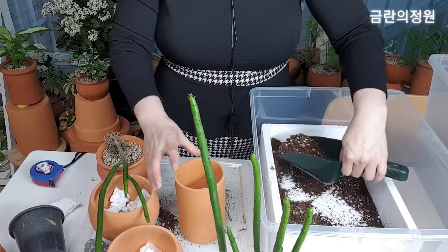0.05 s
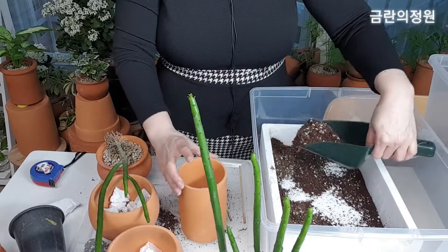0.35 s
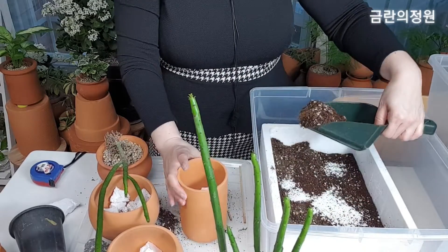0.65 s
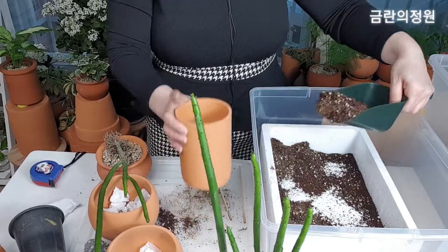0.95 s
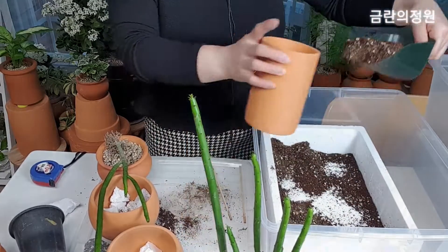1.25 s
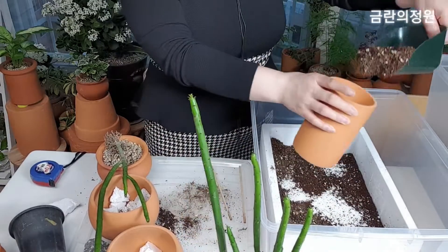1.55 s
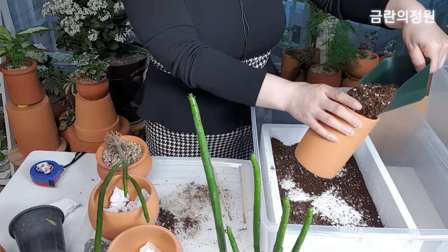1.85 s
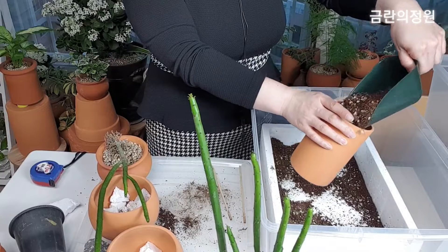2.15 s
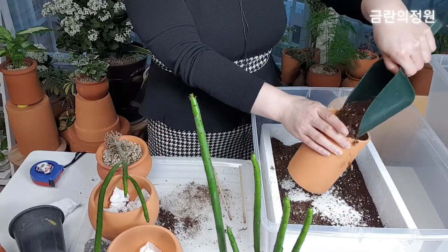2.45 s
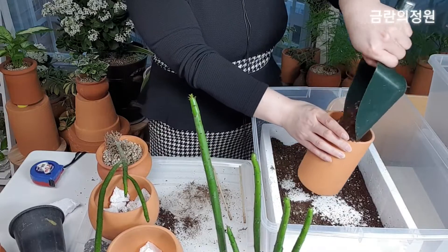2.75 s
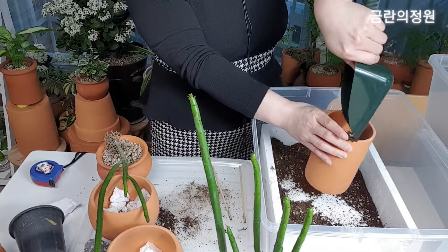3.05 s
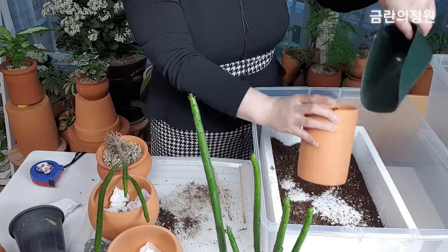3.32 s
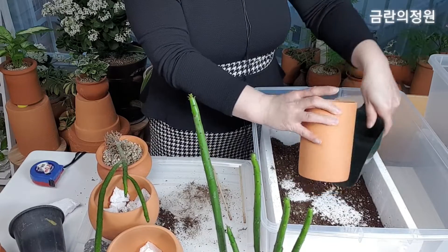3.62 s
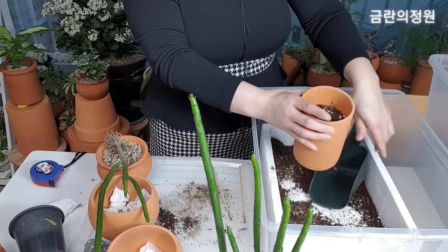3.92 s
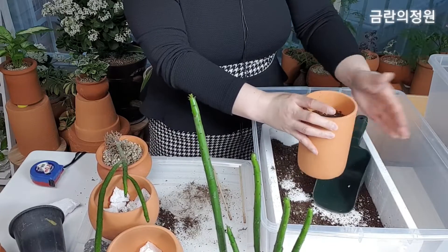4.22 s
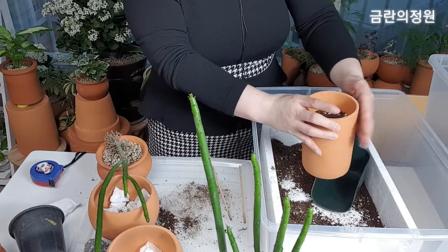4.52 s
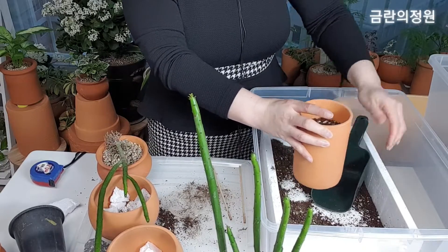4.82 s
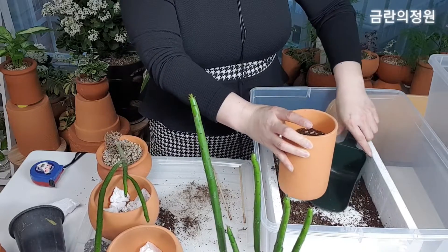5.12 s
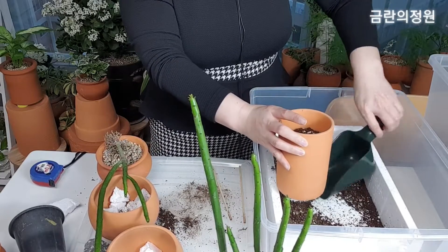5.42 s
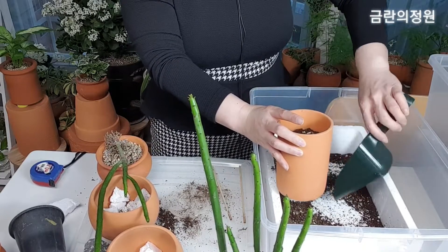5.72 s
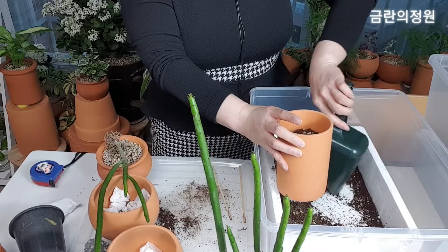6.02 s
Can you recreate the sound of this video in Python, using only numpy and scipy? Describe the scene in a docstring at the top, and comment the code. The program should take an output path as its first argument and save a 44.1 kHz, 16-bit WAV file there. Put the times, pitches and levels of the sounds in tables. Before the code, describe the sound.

A plastic scoop digs into gritty soil in a plastic bin, with short scrapes and hollow knocks through the first 0.8 seconds and a soft rustle of clothes. From about 1.3 to 2 seconds, an empty clay pot slips through fingers with a dry, bell-like ring. Between 2 and 3.5 seconds, soil trickles and rattles into the pot, small clods landing with hollow plops while the scoop clinks lightly on the rim. The scoop knocks at 3.8 seconds, then falls and bounces in the bin around 4.1 with a booming thump, the loudest sound. A hand pats the filled pot four times from 4.3 to 4.8 seconds, the last two stronger. From 5 seconds to just past 6, the scoop scrapes and knocks through the soil again. Everything sounds near, in a small room with slight reverberation and faint, low background noise.

```python
"""Potting soil and a clay pot

Gritty soil is scooped from a plastic bin and poured into a hand-held clay pot in a small room.
Friction makes the empty pot sing as it slips through the fingers; grains rattle into it and the
scoop clinks on the rim. The scoop drops into the bin, a hand pats the pot, and the scoop digs in
again. Each impact or stream of grains excites the resonances of the body that it strikes."""
import sys
import numpy as np
from scipy import signal
from scipy.fft import rfft, irfft
from scipy.io import wavfile
from scipy.ndimage import uniform_filter1d

SR = 44100
rng = np.random.default_rng(int(sys.argv[2]) if len(sys.argv) > 2 else 0)


def unload_wav(signal):
    """Save mono or channel-first audio to the path in sys.argv[1] as 16-bit WAV at rate SR, clipped to [-1, 1]."""
    wavfile.write(
        sys.argv[1],
        SR,
        np.round(np.clip(np.atleast_2d(signal).T, -1, 1) * 32767).astype(np.int16),
    )


N = 272097
CUTOFF_HZ = 16000

# spectral envelopes of the scoop, the clay wall and the soil in the pot: f/Hz, level/dB
SCOOP_ENVELOPE = [(40, 1), (100, -3), (160, -0.5), (400, 0.5), (800, 7), (1400, -2.5), (3000, 0.5),
                  (5000, -5.5), (9000, -12), (12000, -17.5), (16000, -39)]
CLAY_ENVELOPE = [(40, 4), (170, -15.5), (350, -2), (900, 1), (1500, -8), (3500, 1), (6000, -10.5),
                 (10000, -2), (16000, -25)]
SOIL_ENVELOPE = [(60, -18.5), (300, -3), (800, 9), (1400, -12), (3000, -18), (6000, -17.5), (10000, -11),
                 (13000, -23.5), (16000, -29)]
# resonances of the scoop and the part-filled pot: f/Hz, bandwidth/Hz, level/dB re the envelope
SCOOP_RESONANCES = [(470, 25, 7), (652, 17, 13), (861, 16, 9.5), (1142, 30, 10), (1230, 17, -8),
                    (1510, 25, 11), (1744, 19, 12.5), (2000, 110, 8), (2380, 69, 3), (2590, 31, 12),
                    (3300, 420, 1.5), (4195, 170, 5), (5750, 36, 8)]
POT_RESONANCES = [(620, 12.7, 11.7), (1098, 56, 4.9), (1650, 150, 2.5), (2340, 31, 1.2), (3170, 56, 10.5),
                  (4170, 37, 11), (5810, 71, 12), (6370, 20, 2.9), (6690, 41, 13.4), (7800, 44, 12),
                  (8400, 41, 11)]
# a hand pats the filled pot: t/s, level/dB, hardness/dB, contact time/s, favoured f/Hz
HAND_PATS = [(4.2932, -34.5, 0, 0.0058, 1180), (4.4634, -34, 4, 0.0051, 1200),
             (4.6248, -27.5, 5.5, 0.0038, 458), (4.7924, -27, 2, 0.0047, 1180)]


def from_db(db):
    """Amplitude ratio of a level in decibels."""
    return 10 ** (np.asarray(db) / 20)


def rms(x):
    """Root-mean-square amplitude."""
    return np.sqrt(np.mean(x ** 2) + 1e-20)


def seconds(length):
    """Sample times over a duration."""
    return np.arange(int(length * SR)) / SR


def at_hz(points, hz):
    """Interpolation on a logarithmic frequency axis."""
    known_hz, values = np.transpose(points)
    return np.interp(np.log(np.maximum(hz, 1)), np.log(known_hz), values)


def band(x, edges, order=3):
    """Butterworth band-pass filter."""
    return signal.sosfilt(signal.butter(order, edges, "band", fs=SR, output="sos"), x)


def through(x, response):
    """Convolution with an impulse response."""
    return signal.fftconvolve(x, response)[:len(x)]


def add(out, s, sound):
    """Superposition of a sound that starts at time s."""
    start = max(round(s * SR), 0)
    out[start:start + len(sound)] += sound[:N - start]


def body_response(envelope, modes=(), size=32768):
    """Minimum-phase impulse response of a spectral envelope with Lorentzian resonance peaks."""
    hz = np.arange(size // 2 + 1) * SR / size
    peaks = sum(from_db(db) ** 2 / (1 + (2 * (hz - centre) / width) ** 2) for centre, width, db in modes)
    magnitude = from_db(at_hz(envelope, hz)) * np.sqrt(1 + peaks)
    cepstrum = irfft(np.log(magnitude))
    # folding the cepstrum makes the response causal
    cepstrum[1:size // 2] *= 2
    cepstrum[size // 2 + 1:] = 0
    return irfft(np.exp(rfft(cepstrum)))[:size // 2]


def coloured_noise(envelope):
    """Stationary noise of unit rms with a given spectral envelope."""
    noise = through(rng.standard_normal(N), body_response(envelope))
    return noise / rms(noise)


def gesture(start_s, length_s, db, swell_db, attack_s, release_s):
    """Amplitude envelope of a movement: linear attack, even change of level, exponential release."""
    age = np.arange(N) / SR - start_s
    progress = np.clip(age / length_s, 0, 1)
    release = np.exp(-np.clip((age - length_s) / release_s, 0, 20))
    return np.clip(age / attack_s, 0, 1) * from_db(db + swell_db * (progress - .5)) * release


def contact_force(contact_s, size=4096):
    """Broadband excitation: the force builds as two surfaces meet and dies in a brief chatter."""
    age = (np.arange(size) + 1) / SR / max(contact_s, 1e-4)
    shape = (1 - np.exp(-age / 0.29)) * np.exp(-age)
    force = rng.standard_normal(size) * shape
    for _ in range(2):   # flatten the spectrum, then confine the pulse in time again
        spectrum = rfft(force, 2 * size)
        force = irfft(spectrum / (np.abs(spectrum) + 1e-12))[:size] * shape ** 0.13
    return force


def impacts(blows, envelope, modes, balance_db, click_slope, favour_db, width_hz, q, gain_db, ring_hz=()):
    """Modal excitation: the spot struck favours some modes; hardness adds click, long contact boom."""
    out = np.zeros(N)
    bands_hz = [(30, 300), (300, 1400), (1400, 5000), (5000, 16000)]   # boom, body, ring, click
    boom_db, ring_db, click_db = balance_db   # relative to the body band
    for s, body_db, hard_db, contact_s, *spot_hz in blows:
        # higher modes lose their energy faster, so their peaks are wider
        favoured = [(hz, width_hz + hz / q, favour_db) for hz in (*spot_hz, *ring_hz)]
        struck = through(body_response(envelope, [*modes, *favoured]), contact_force(contact_s))
        push_db = 12.5 * np.log2(contact_s / 0.0041)   # a longer push moves the whole wall
        levels = (boom_db + push_db, 0, ring_db + hard_db, click_db + click_slope * hard_db)
        for edges, db in zip(bands_hz, levels):
            part = band(struck, edges)
            onset_rms = rms(part[:int(.025 * SR)])
            add(out, s, part * from_db(body_db + db + gain_db) / onset_rms)
    return out


def grains(base_per_s, spread_db, dust, cycles, clump_db):
    """Shot noise at an even level: clustered grain impacts ring briefly over a hiss of fine dust."""
    clumps = uniform_filter1d(rng.standard_normal(N), size=220)
    hits = rng.random(N) < base_per_s / SR * from_db(clump_db * clumps / rms(clumps))
    strengths = from_db(spread_db * np.minimum(rng.exponential(1, N), 3.5))
    clicks = hits * strengths * rng.choice([-1, 1], N)
    pitches_hz = np.geomspace(900, 15000, 28)
    pitch_index = rng.integers(0, len(pitches_hz), N)
    ringing = np.zeros(N)
    for k, hz in enumerate(pitches_hz):
        radius = from_db(-60 * hz / (cycles * SR))   # 60 dB of decay in the given cycles
        resonator = [1, -2 * radius * np.cos(2 * np.pi * hz / SR), radius ** 2]
        ticks = signal.lfilter([1, 0, -1], resonator, clicks * (pitch_index == k) + 1e-18)
        ringing += ticks / rms(ticks) * np.sqrt(hz)
    # the bare impacts also knock on the surface under the grains
    stream = ringing / rms(ringing) + 0.65 * clicks / rms(clicks) + dust * rng.standard_normal(N)
    return stream / np.sqrt(uniform_filter1d(stream ** 2, size=1100) + 1e-9)


def band_flows(moves, balance_db, attack_s, release_s):
    """Amplitude envelopes of body, rasp and fizz; brightness tilts the spectrum from body to fizz."""
    flows = np.zeros((3, N))
    for *move, bright_db in moves:
        gains = from_db(np.array(balance_db) + bright_db * np.array([-1, 0, 1]))
        flows += np.outer(gains, gesture(*move, attack_s, release_s))
    return flows


def running_grit(flows, response, stream):
    """Forced vibration: a stream of grains drives a body, each of three bands following its flow."""
    out = np.zeros(N)
    bands_hz = [(200, 1400), (1400, 5000), (5000, 16000)]   # body, rasp, fizz
    for edges, flow in zip(bands_hz, flows):
        part = band(response, edges)
        out += through(stream * flow, part) / np.linalg.norm(part)
    return out


def background():
    """Ambient noise: faint, steady and strongest in the bass."""
    # spectral envelope: f/Hz, level/dB
    envelope = [(15, -18), (25, 10), (50, 8), (95, -1.5), (160, -0.5), (405, -3), (887, -2), (1840, -12.5),
                (2550, -13.5), (3160, -14), (3920, -23), (4250, -18.5), (5000, -27.5), (5730, -19),
                (7510, -29), (8360, -23), (10000, -30), (11000, -39), (16000, -52)]
    return from_db(-59) * coloured_noise(envelope)


def room(x, early_db, late_db, early_s):
    """Early reflections from bin walls and table, followed by the room's duller reverberation."""
    # reverberation time: f/Hz, T60/s
    decay_times = [(100, 0.61), (500, 0.4), (1500, 0.38), (4000, 0.34), (12000, 0.31)]
    t = seconds(.7)
    edges = np.geomspace(30, CUTOFF_HZ, num=9)
    tail = np.zeros(len(t))
    for low, high in zip(edges, edges[1:]):
        t60 = at_hz(decay_times, np.sqrt(low * high))
        tail += band(rng.standard_normal(len(t)), (low, high)) * from_db(-60 * t / t60)
    tail *= np.clip((t - .006) / 0.029, 0, 1)
    echoes = rng.standard_normal(len(t)) * (t > .002) * np.exp(-(t / early_s) ** 2)
    early = from_db(early_db) * echoes / np.linalg.norm(echoes)
    late = from_db(late_db) * tail / np.linalg.norm(tail)
    return x + through(x, early + late)


def soft_swishes():
    """Amplitude-modulated noise: soft swishes of movement, and the dull rush after a knock."""
    # swishes: t/s, duration/s, level/dB, swell/dB
    swishes = [(0.775, 0.059, -42.5, -12.5), (1.21, 0.096, -55, 6), (3.33, 0.13, -50, 13.5),
               (4.335, 0.093, -34, 4)]
    # spectral envelope: f/Hz, level/dB
    envelope = [(59, -21), (100, -11), (318, -8), (743, -3.5), (877, -5), (993, -2.5), (1120, -5.5),
                (2130, -11), (6000, -31), (14000, -51)]
    gain = sum(gesture(*swish, attack_s=0.036, release_s=0.063) for swish in swishes)
    return from_db(-5) * gain * coloured_noise(envelope)


def clothes_rustle():
    """Friction noise of clothes and grip, in muffled bursts."""
    # movements: t/s, duration/s, level/dB, swell/dB
    moves = [(0.012, 0.18, -43, -23), (0.292, .02, -46, 0), (1.758, 0.14, -48, -9)]
    # spectral envelope: f/Hz, level/dB
    envelope = [(50, -14), (130, -5), (200, -7.5), (320, -1), (500, -8), (1500, -14), (8000, -72)]
    motion = sum(gesture(*move, attack_s=0.01, release_s=0.03) for move in moves)
    return from_db(-7.5) * motion * coloured_noise(envelope)


def creeping_grip():
    """Narrow-band resonance: slow friction of skin keeps one wall mode of the pot whispering."""
    # creeps of the hand: t/s, duration/s, f/Hz, bandwidth/Hz, level/dB
    creeps = [(0.3, 0.18, 5850, 161, -50), (0.896, 0.27, 2490, 398, -66), (1.116, 0.16, 3100, 80, -70)]
    out = np.zeros(N)
    for s, length_s, hz, width_hz, db in creeps:
        edges = (hz - width_hz / 2, hz + width_hz / 2)
        whisper = band(rng.standard_normal(SR), edges, order=2)[:int(length_s * SR)]
        add(out, s, from_db(db) * np.hanning(len(whisper)) * whisper / rms(whisper))
    return out


def singing_pot():
    """Frictional excitation: dry skin on unglazed clay feeds bell-like modes until the hand damps them."""
    # finger slips: t/s, level/dB, rise/s, fade/s, cutoff/Hz, grip (0 first, 1 second), undamped time/s
    slips = [(1.328, -1, 0.013, 0.071, 15000, 0.17, 0.34), (1.503, -3, 0.004, 0.032, 950, 0.15, 0.093),
             (1.716, -1.5, 0.0085, 0.19, 15460, 0.94, 0.089)]
    # wall modes of the empty pot: f/Hz, T60/s, level/dB at the first grip, level/dB at the second
    wall_modes = [(797, 0.72, -44, -50.5), (820, 0.38, -54.5, -51.5), (950, 0.076, -74, -54),
                  (1630, 0.095, -43, -50.5), (1600, 1, -55, -62), (1633, 0.14, -44.5, -63),
                  (2000, 0.042, -49.5, -70), (2600, 0.18, -69, -63), (2760, 0.21, -41.5, -55.5),
                  (2800, 0.21, -38.5, -64), (3230, 0.19, -48, -57), (4180, 0.03, -44.5, -55),
                  (4430, 0.39, -56, -68), (4500, 0.051, -58, -48), (4980, 0.28, -58, -82),
                  (5440, 0.18, -57, -84), (5290, 0.15, -49.5, -81), (6000, 0.3, -68, -69),
                  (6090, 0.063, -48, -70), (7065, 0.22, -61, -88), (7300, 0.1, -53, -84),
                  (7750, 0.079, -61.5, -63.5), (8270, 0.1, -63, -81), (8950, 0.11, -64, -73),
                  (9530, 0.14, -65.5, -84), (10900, 0.14, -71, -97), (12600, 0.12, -72, -102)]
    # spectral envelope of the friction hiss: f/Hz, level/dB
    hiss_envelope = [(120, -63), (200, -35), (696, -13.5), (818, 0), (1360, -19.5), (1630, -15),
                     (2290, -13.5), (2850, -2), (3470, -17.5), (6080, -19), (15000, -57)]
    out, t = np.zeros(N), seconds(.5)
    ring_samples, damping_s = .2 * SR, 0.07
    sagging_t = t * (1 - 0.02 * t)   # the pitch sags a little as the finger pressure changes
    for s, db, rise_s, fade_s, cutoff_hz, grip, free_s in slips:
        slip = np.minimum(t / rise_s, 1) * np.exp(-np.maximum(t - 2 * rise_s, 0) / fade_s)
        sound = slip * coloured_noise(hiss_envelope)[:len(t)] * from_db(-35 - 9 * grip)
        for hz, t60, first_db, second_db in wall_modes:
            mode = np.sin(2 * np.pi * hz * sagging_t) * from_db(-60 * t / t60)
            ring = through(slip * rng.standard_normal(len(t)), mode)
            mode_db = 0.5 + first_db + grip * (second_db - first_db)
            sound += ring * np.sqrt(ring_samples / np.sum(ring ** 2)) * from_db(mode_db)
        sound *= np.exp(-np.maximum(t - free_s, 0) / damping_s)
        low_pass = signal.butter(5, cutoff_hz, fs=SR, output="sos")
        add(out, s, from_db(db) * signal.sosfilt(low_pass, sound))
    return out


def bin_thumps():
    """Low wall modes of the bin boom when it is bumped and when the scoop falls in and bounces."""
    # blows: t/s, level/dB, hardness/dB, contact time/s, favoured low f/Hz, favoured high f/Hz
    thumps = [(0.5903, -39, -3.5, 0.0063, 258, 552), (4.004, -27, 0.5, 0.0065, 290, 360),
              (4.0874, -17.5, 1.5, 0.0064, 182, 620), (4.2006, -36, -17, 0.0063, 159, 560),
              (4.2591, -37.5, -0.5, 0.0039, 150, 551), (4.9413, -55, 1, 0.0027, 280, 630),
              (5.082, -36.5, 4, 0.0089, 131, 348), (5.9091, -35.5, -1, 0.0041, 320, 400)]
    # spectral envelope: f/Hz, level/dB
    envelope = [(25, -19), (60, -0.5), (200, -9.5), (600, -6.5), (1000, -9.5), (1600, -14), (3000, -15.5),
                (6000, -25.5), (10000, -34), (16000, -58)]
    # wall resonances: f/Hz, bandwidth/Hz, level/dB re the envelope
    modes = [(46.3, 3.2, 21), (76, 13, 4), (143, 4.8, 17.5), (179, 12.7, 18.5), (266, 41, 13.5),
             (360, 13, 8), (449, 4.6, 9.5), (600, 29, 1), (672, 28, 12), (827, 28, 11), (2350, 38, -5)]
    return impacts(thumps, envelope, modes, balance_db=(-11, -12.5, -27), click_slope=3.5,
                   favour_db=16.5, width_hz=4.6, q=9.7, gain_db=1.13)


def pot_pats():
    """Damped vibration of the filled pot as a hand pats its side."""
    # resonances of the filled pot: f/Hz, bandwidth/Hz, level/dB re the envelope
    modes = [(470, 300, 7.2), (1180, 28, 18), (1740, 150, 13.3), (2300, 370, 12.6), (3085, 85, 15.5),
             (3770, 40, 2.5), (4190, 110, 11), (5600, 400, 13.7), (6400, 52, 21), (8540, 65, 15)]
    return impacts(HAND_PATS, CLAY_ENVELOPE, modes, balance_db=(-8, -1.5, -10), click_slope=-0.5,
                   favour_db=13, width_hz=57, q=80, gain_db=-4, ring_hz=(3120,))


def scoop_knocks():
    """Free vibration of the hollow scoop after each knock."""
    # blows: t/s, level/dB, hardness/dB, contact time/s, favoured low f/Hz, favoured high f/Hz
    knocks = [(0.001, -35, -3, 0.0058, 820, 1720), (0.3633, -41.5, 1, 0.0027, 690, 1900),
              (0.382, -35, 4.5, 0.0047, 480, 2130), (0.3966, -34.5, 0.5, 0.0033, 470, 2020),
              (0.4128, -35.5, -6, 0.0006, 470, 1330), (0.778, -29.5, -10, 0.0041, 610, 1286),
              (2.0006, -36, -10.5, 0.0024, 720, 1475), (2.0106, -51, 8.5, 0.0034, 650, 1600),
              (2.0546, -51, 6.5, 0.0025, 670, 1660), (2.0903, -48.5, -0.5, 0.004, 650, 1650),
              (3.2056, -53, 9, 0.003, 1080, 1830), (3.2208, -51, 6.5, 0.00097, 1100, 1850),
              (3.8245, -25, -1, 0.0022, 1000, 2050), (4.0777, -26.5, 5, 0.0064, 680, 2350),
              (5.1415, -34.5, 0, 0.0033, 855, 2960), (5.5366, -36, -0.5, 0.0059, 974, 2750),
              (5.5805, -39, -8, 0.0026, 650, 2600), (5.7323, -40, 0, 0.0037, 1025, 2260),
              (5.9946, -45.5, 3.5, 0.0019, 586, 2380), (6.0874, -38.5, 12, 0.01, 1020, 3370)]
    return impacts(knocks, SCOOP_ENVELOPE, SCOOP_RESONANCES, balance_db=(-17, -0.5, -13.5),
                   click_slope=1.6, favour_db=16, width_hz=51, q=130, gain_db=-1.5)


def stone_ticks(contact_s=0.0017):
    """Short contacts of single stones excite the high resonances of the blade."""
    # stones: t/s, level/dB, favoured f/Hz
    stones = [(0.114, -64, 6100), (0.2342, -73, 1600), (0.34, -67, 1300), (0.5596, -67.5, 2000),
              (2.115, -64.5, 4500), (2.6233, -55.5, 3560), (2.7757, -56.5, 3240), (3.1065, -62.5, 3470),
              (3.2483, -59, 4970), (5.3147, -60, 2830), (5.4863, -64, 6000)]
    ticks = [(s, db, 0, contact_s, hz) for s, db, hz in stones]
    return impacts(ticks, SCOOP_ENVELOPE, SCOOP_RESONANCES, balance_db=(4, 13, 5.5), click_slope=1,
                   favour_db=13, width_hz=260, q=46, gain_db=-2.5)


def rim_clinks():
    """Lightly damped high modes of the clay ring as scoop and stones strike it."""
    # blows: t/s, level/dB, hardness/dB, contact time/s, favoured low f/Hz, favoured high f/Hz
    clinks = [(2.2306, -48, 2.5, 0.0053, 3120, 5900), (2.2861, -45.5, 8, 0.0048, 3120, 5800),
              (2.4483, -43.5, 4.5, 0.0035, 3110, 6690), (2.4795, -49, 12.5, 0.0026, 3100, 6660),
              (2.8887, -41, 0, 0.0032, 4170, 6690), (2.9379, -46.5, 6.5, 0.0051, 4170, 6600),
              (3.0081, -53, 7.5, 0.0047, 3500, 6370), (3.1738, -57.5, 26, 0.0018, 3456, 8300)]
    return impacts(clinks, CLAY_ENVELOPE, POT_RESONANCES, balance_db=(-17, -2, -2.5), click_slope=.5,
                   favour_db=29, width_hz=14, q=140, gain_db=1)


def falling_clods():
    """Cavity resonance: clods drop and settle in the pot and sound its hollow."""
    # clods: t/s, level/dB, hardness/dB, contact time/s, cavity f/Hz
    clods = [(2.4366, -30.5, -1, 0.0083, 658), (2.5105, -32, -7, 0.0015, 652),
             (2.5343, -34, -5, 0.0027, 650), (2.5729, -33.5, 1, 0.0058, 687),
             (2.5949, -30.5, -2, 0.008, 650), (2.7993, -42, -0.5, 0.004, 650),
             (2.8753, -36, -10, 0.0021, 650), (2.9975, -50.5, 13, 0.0038, 1060),
             (3.029, -50, 8, 0.0044, 706), (3.4643, -37.5, -22, 0.005, 533),
             (3.4779, -37.5, -7.5, 0.0084, 553)]
    return impacts(clods, SOIL_ENVELOPE, POT_RESONANCES, balance_db=(-27.5, -8, -22), click_slope=2.12,
                   favour_db=21.5, width_hz=29, q=63, gain_db=-1.5, ring_hz=(1736,))


def grit_on_scoop():
    """Granular excitation: grit scrapes and rattles on the scoop as it digs, is knocked or lands."""
    # scrapes and rattles: t/s, duration/s, level/dB, swell/dB, brightness/dB
    bursts = [(0, 0.03, -34, -26, 2.5), (0.058, 0.12, -54.5, -14, -3), (0.316, 0.051, -47.5, 13, -4),
              (.362, 0.041, -35.5, 1, -3), (0.402, 0.17, -52, -24, -4), (0.547, 0.11, -61, 3, 1),
              (3.835, 0.031, -35, -1, -0.5), (3.978, 0.033, -43.5, -11, 5), (4.009, 0.04, -35, -2, -1),
              (4.11, 0.2, -45, -29, -4), (5.084, 0.037, -40, -11, -5.5), (5.165, 0.052, -43, 6, -2),
              (5.232, 0.014, -44, 11, -1.5), (5.328, 0.043, -41.5, -12, 0.5),
              (5.375, 0.018, -50.5, 4, -10.5), (5.396, 0.047, -33.5, -8, 1), (5.55, 0.09, -49.5, -4, -6.5),
              (5.618, 0.1, -43, 9, 2), (5.76, .13, -57.5, -3, -2.5), (5.918, 0.066, -40, -14.5, 1),
              (5.997, 0.026, -40, 0.5, -2.5), (6.048, 0.053, -45, 15, -2.5), (6.097, 0.075, -38, -5, 1.5)]
    # spectral envelope of grit on the blade: f/Hz, level/dB
    envelope = [(88, -20), (150, -1), (475, -8.5), (1100, -7.5), (1790, -4.5), (1980, 3), (2600, 2),
                (3420, 0), (5250, -12), (5790, -16), (8900, -18), (11500, -26), (16000, -35)]
    # blade resonances: f/Hz, bandwidth/Hz, level/dB re the envelope
    modes = [(470, 20, -18), (650, 180, 11), (1000, 130, 4.5), (2000, 68, -9), (2380, 170, 4),
             (2770, 63, 3), (3300, 47, 3), (4430, 190, 3), (5850, 53, 7)]
    flows = band_flows(bursts, balance_db=(0.34, 0, -7), attack_s=0.0099, release_s=.011)
    stream = grains(base_per_s=1800, spread_db=1, dust=0.62, cycles=30, clump_db=5)
    return from_db(-4) * running_grit(flows, body_response(envelope, modes), stream)


def pouring_soil():
    """Granular flow: soil sliding off the scoop, or shaken by a pat, excites the pot's resonances."""
    # spurts and trickles: t/s, duration/s, level/dB, swell/dB, brightness/dB
    slides = [(2.003, 0.27, -63, -3, 5.5), (2.218, 0.035, -47.5, -4, -1.5), (2.26, 0.084, -56.5, -4, -4),
              (2.363, 0.064, -47.5, 3, 0), (2.423, .035, -42, 1.5, 4.5), (2.47, 0.17, -44.5, 1, 1.5),
              (2.68, .13, -52.5, -1.5, 1), (2.82, 0.07, -47, 7, -4.5), (2.888, 0.074, -46, 5, 2),
              (2.98, 0.057, -49.5, 4.5, 0), (3.05, 0.11, -61.5, -7, 3), (3.18, 0.021, -55.5, -4, 4),
              (3.22, 0.046, -69, -6, -2), (3.56, 0.33, -74, -24.5, 0.5)]
    balance_db = (2.47, 0, -8.5)   # body, rasp, fizz
    poured = band_flows(slides, balance_db, attack_s=0.004, release_s=0.013)
    rattles = [(s, 0.018, db - 22, 0, 0) for s, db, *_ in HAND_PATS]   # one brief, faint slide per pat
    shaken = band_flows(rattles, balance_db, attack_s=0.0099, release_s=0.023)
    stream = grains(base_per_s=4200, spread_db=3.5, dust=0.45, cycles=38, clump_db=4.5)
    pot = body_response(SOIL_ENVELOPE, POT_RESONANCES)
    return from_db(-0.5) * running_grit(poured + shaken, pot, stream)


def scene():
    """Superposition of impacts, soil and handling in the room, over the ambient noise."""
    blows = scoop_knocks() + stone_ticks() + bin_thumps() + pot_pats() + rim_clinks()
    soil = falling_clods() + grit_on_scoop() + pouring_soil()
    handling = soft_swishes() + clothes_rustle() + singing_pot() + creeping_grip()
    mix = background() + room(blows + soil + handling, early_db=-10.5, late_db=-17.5, early_s=0.019)
    return mix[None]


def record(dry):
    """Band limiting: the microphone drops the deepest bass, and the top is cut steeply."""
    high_pass = signal.butter(4, 40, "high", fs=SR, output="sos")
    low_pass = signal.ellip(10, .1, 80, CUTOFF_HZ, fs=SR, output="sos")
    return signal.sosfilt(low_pass, signal.sosfilt(high_pass, dry))


dry = scene()
out = record(dry)
unload_wav(out)
```